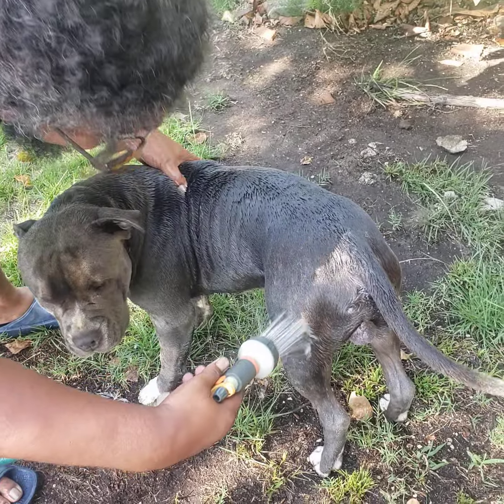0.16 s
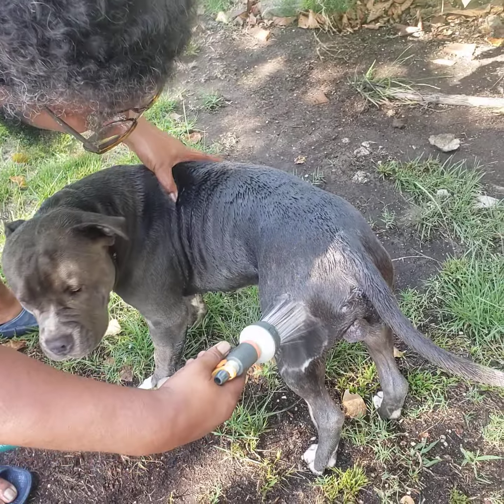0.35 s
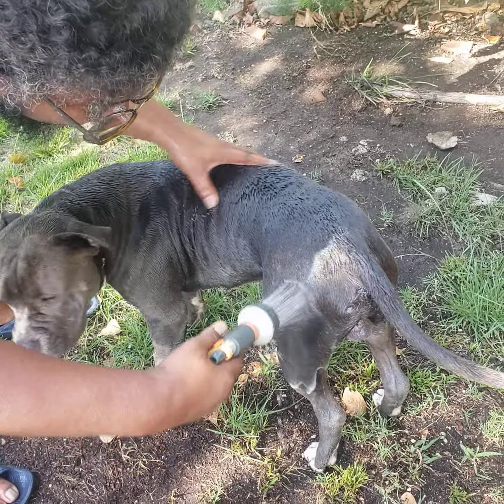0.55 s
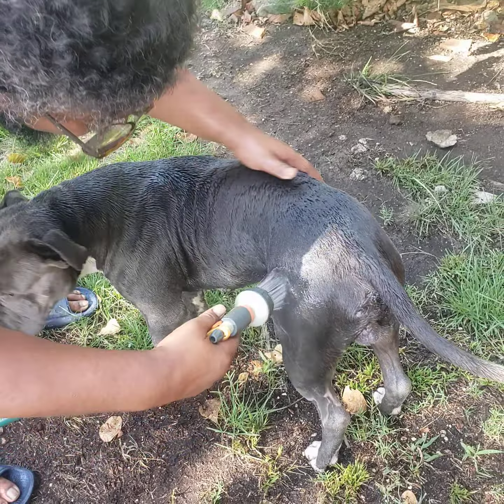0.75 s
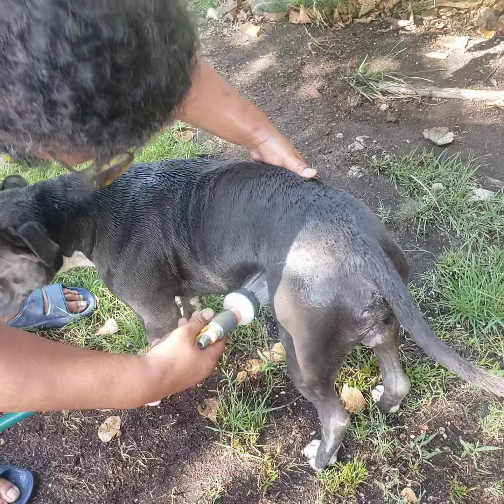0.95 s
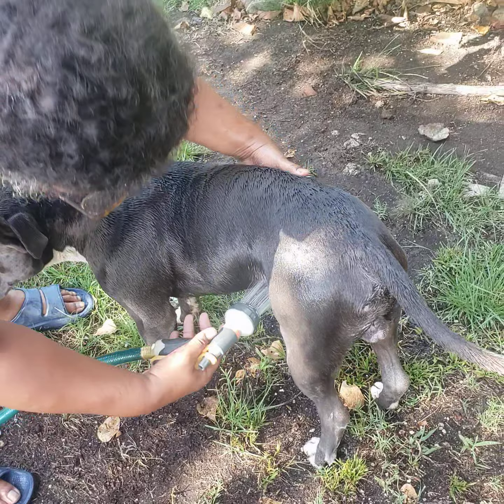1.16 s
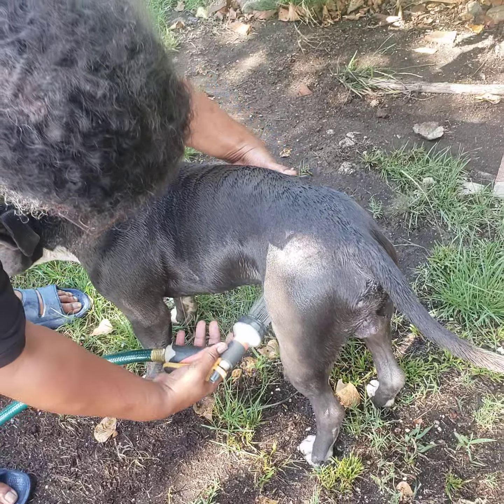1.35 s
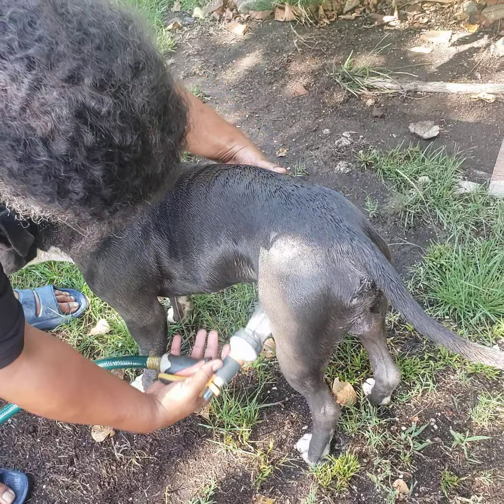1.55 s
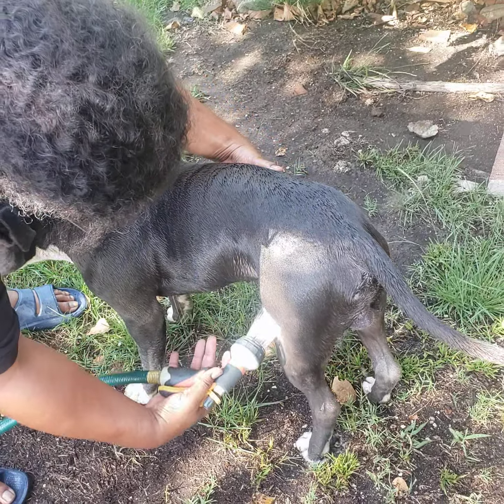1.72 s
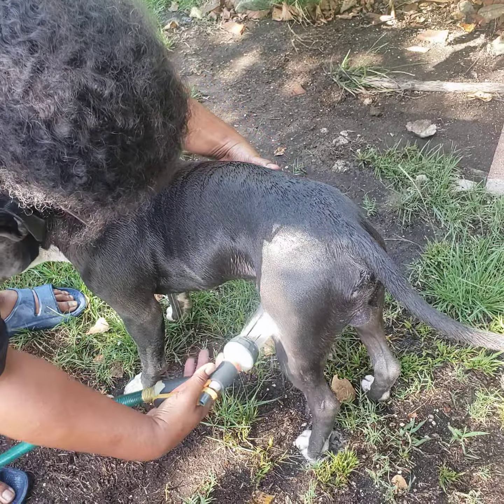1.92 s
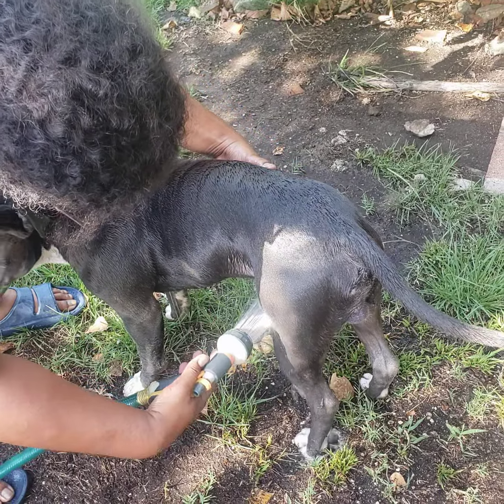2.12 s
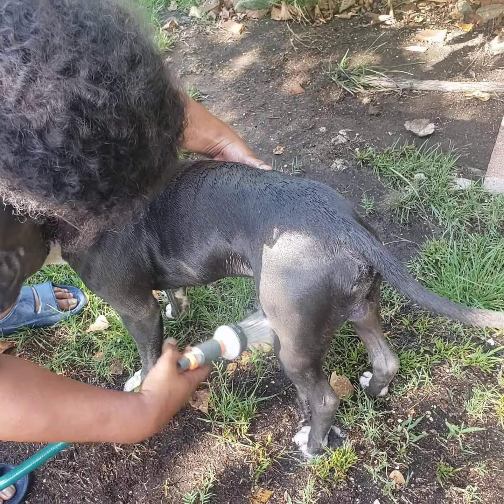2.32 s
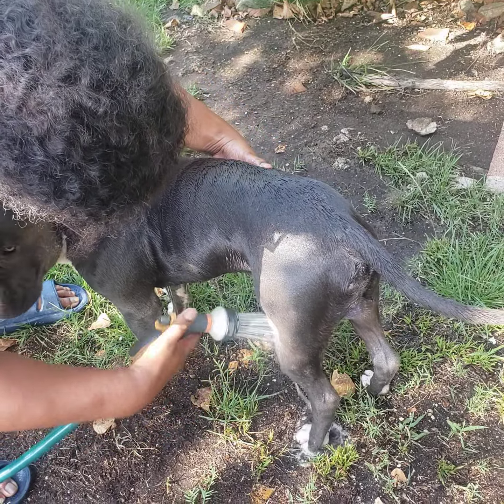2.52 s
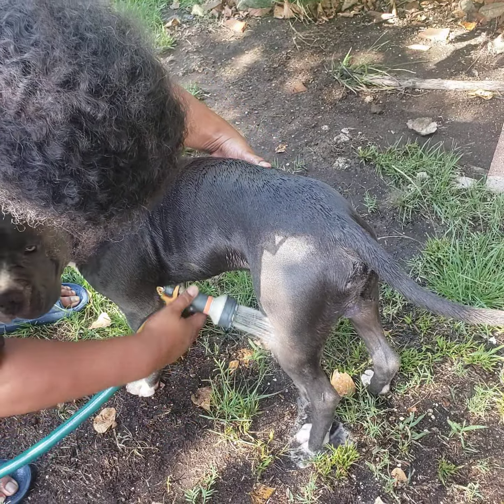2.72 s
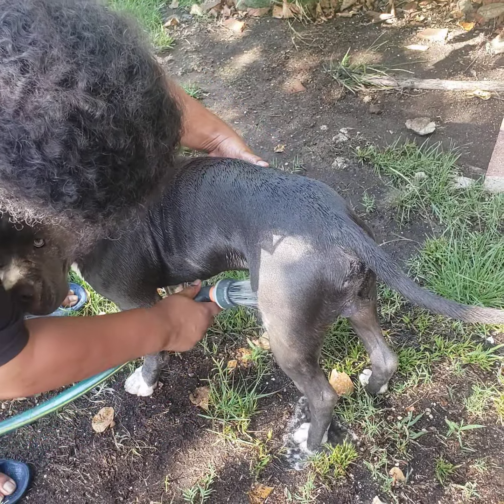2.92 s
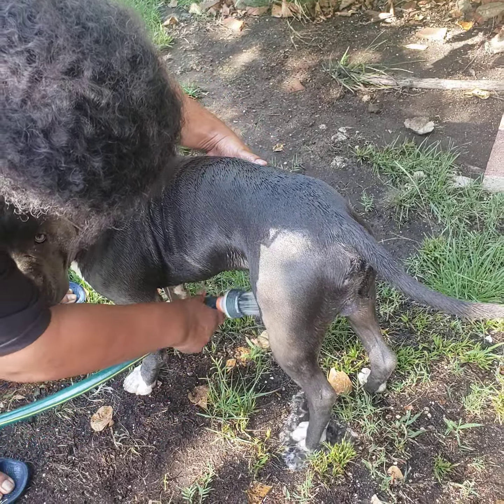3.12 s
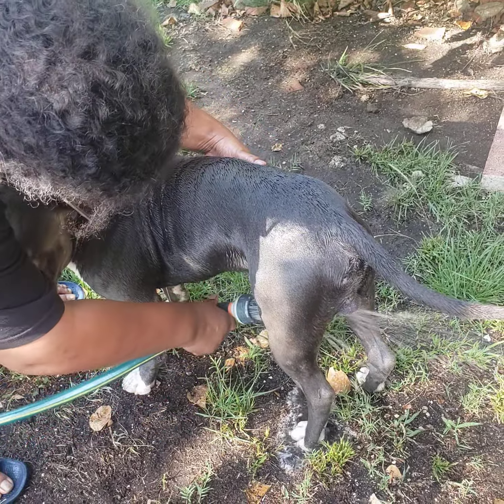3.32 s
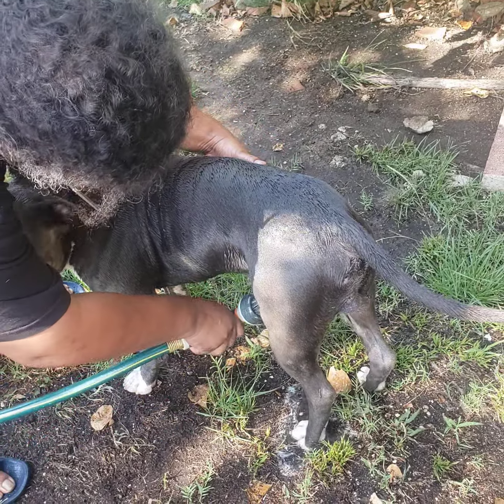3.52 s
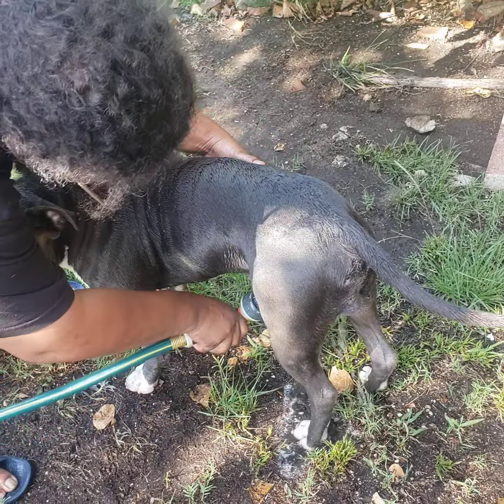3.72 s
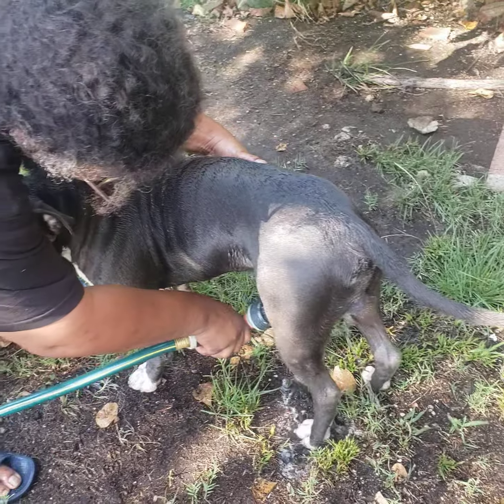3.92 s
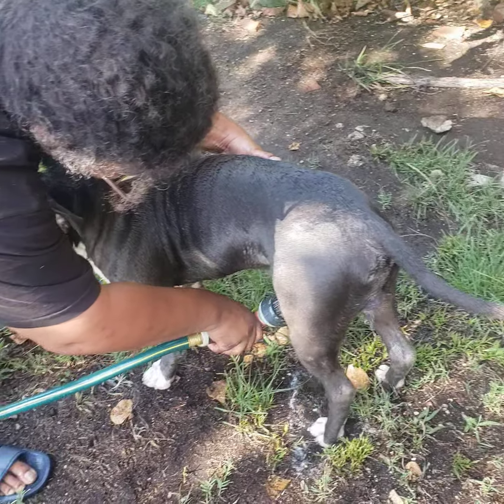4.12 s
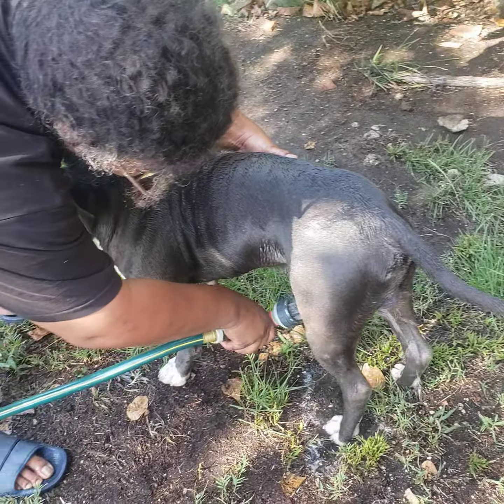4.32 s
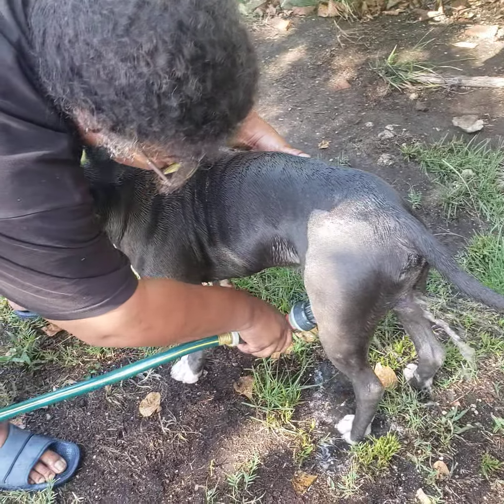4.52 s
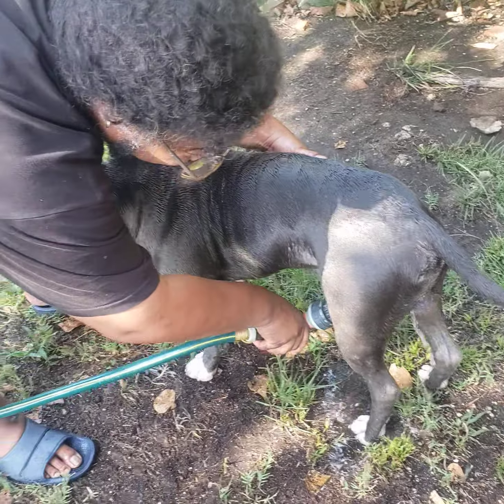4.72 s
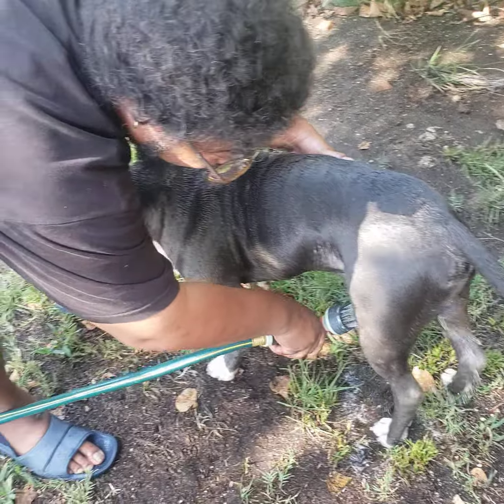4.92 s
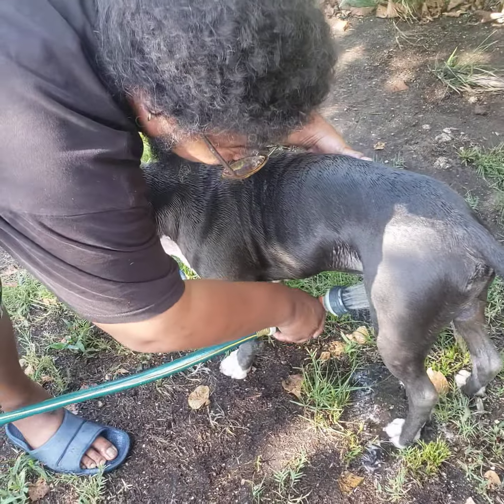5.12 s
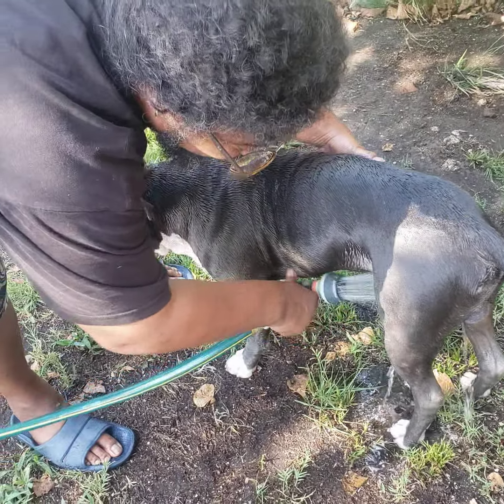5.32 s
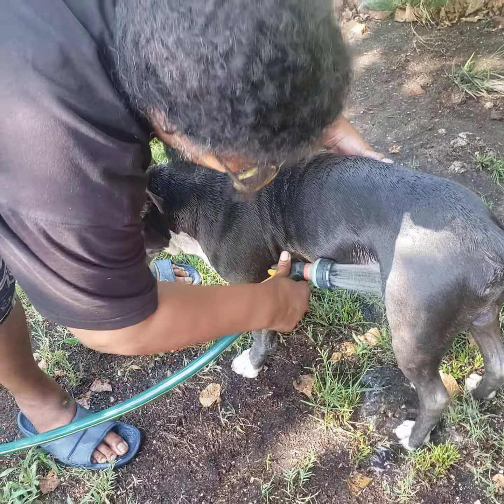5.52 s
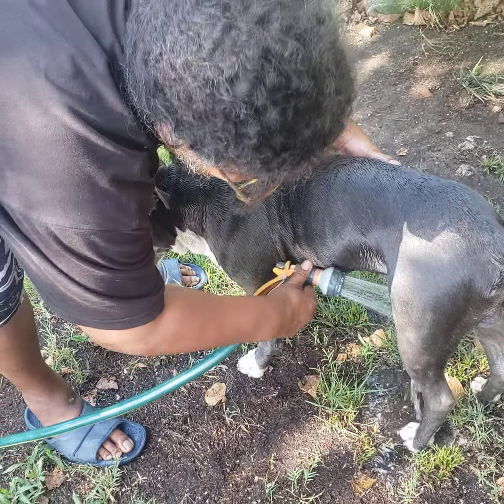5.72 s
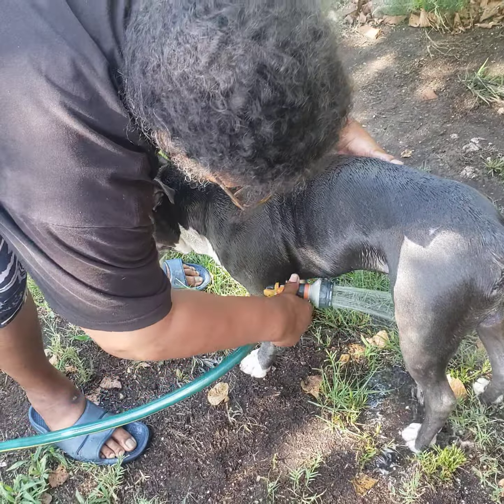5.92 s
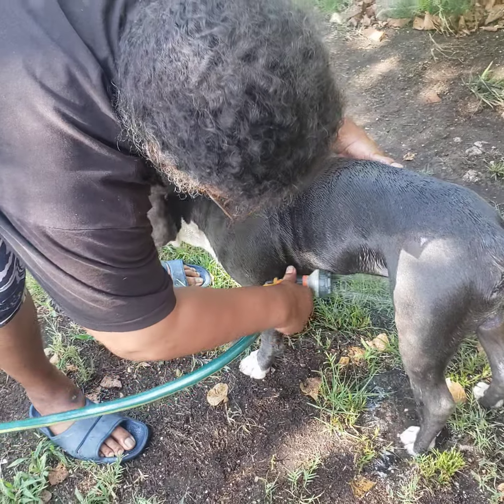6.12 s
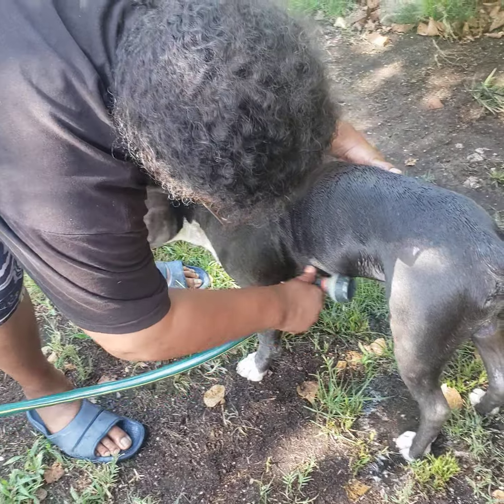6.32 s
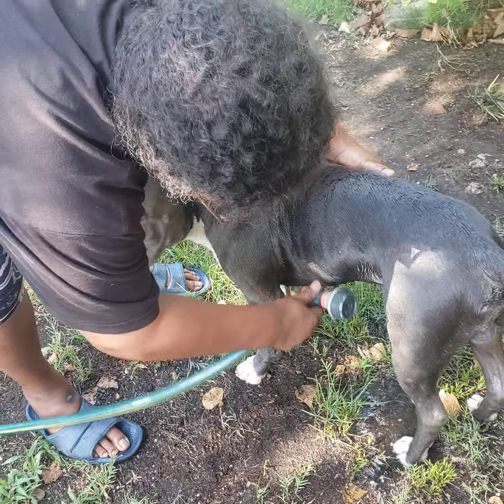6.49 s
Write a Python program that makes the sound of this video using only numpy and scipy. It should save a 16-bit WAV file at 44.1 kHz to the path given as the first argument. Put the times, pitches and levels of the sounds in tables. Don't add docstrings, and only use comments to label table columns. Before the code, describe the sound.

A fine airy water jet hisses steadily near a handheld phone in a garden by day. After a second or so it swings closer, louder and fuller, pattering on wet fur with hollow splashing. It thins out, drops plop and tick nearby, then it grows again before a short rubbery squeak ends the spray. Faint traffic and a far engine sit underneath.

```python
import sys
import numpy as np
from scipy import signal
from scipy.fft import rfft, irfft, next_fast_len
from scipy.io import wavfile

SR = 44100
rng = np.random.default_rng(int(sys.argv[2]) if len(sys.argv) > 2 else 0)


def level_to_linear(level):
    exponent = np.asarray(level, float) / 20
    return 10 ** exponent


def wav_out(sig):
    wavfile.write(sys.argv[1], SR, np.round(np.clip(np.atleast_2d(sig).T, -1, 1) * 32767).astype(np.int16))


N = 289031

# pitch_hz, density_db (per Hz)
TRAFFIC_COLOUR = [(13, -51), (22, -19), (38, -12.5), (62, -4), (75, -2), (146, -11.5), (171, -15.5),
                  (193, -18.5), (222, -15.5), (370, -28.5), (500, -33.5), (650, -42), (1100, -120)]
# time_s, level_db
TRAFFIC_LEVEL = [(0.0, -56), (0.29, -53), (0.46, -52), (0.53, -56), (1.06, -52), (1.95, -57), (2.17, -52),
                 (2.24, -55.5), (2.64, -53.5), (3.87, -55.5), (4.45, -52), (4.54, -58), (4.63, -49.5),
                 (4.78, -54), (5.02, -48.5), (5.29, -53), (5.45, -47.5), (5.58, -53.5), (5.67, -49),
                 (6.2, -50.5), (6.29, -58), (6.38, -48.5), (6.55, -56.5)]
# time_s, pitch_hz, level_db
ENGINE_PASS = [(.2, 125, -67.5), (.45, 150, -65), (.8, 155, -66), (1.1, 125, -63), (1.5, 100, -70),
               (1.9, 80, -65)]
# multiple, level_db
ENGINE_ORDERS = [(1, 3), (1.75, -6)]
# time_s, pitch_hz, level_db
LATE_MOTOR = [(5.66, 133, -75), (5.74, 133, -57.5), (5.9, 132.5, -61.5), (5.98, 131, -77)]
# multiple, level_db
LATE_MOTOR_ORDERS = [(1, 0), (5, -5.5)]
# time_s, pitch_hz, right_db, left_minus_right_db, then partials 2, 3, 5 below the first in _db
VALVE_SQUEAK = [(6.105, 885, -66, -6, -17, -40, -40), (6.126, 893, -45, -7, -20, -33, -35),
                (6.134, 885, -40, -5, -8, -35, -32), (6.143, 832, -27, -12, 0, -37, -23),
                (6.151, 812, -24.5, -4, -3, -34, -23.5), (6.159, 811, -23, -6, -3.5, -34, -25),
                (6.167, 834, -27, -8, -5, -24, -30), (6.175, 832, -27, -10, 0, -23, -29),
                (6.186, 826, -26, -8, 0, -22, -27), (6.198, 836, -26.5, -12, -3, -19, -35),
                (6.206, 850, -32, -15, 2, -29, -45), (6.222, 868, -31, -15, -3, -30, -45),
                (6.23, 875, -39, -8, -7, -30, -45), (6.246, 870, -57, -6, -14, -32, -45),
                (6.265, 856, -59, 5, -20, -35, -45)]
# start_s, peak_db, pitch_hz, left_minus_right_db
LARGE_DROPS = [
    (0.4424, -45, 1820, -0.5),
    (2.909, -43, 2080, 0.0),
    (4.135, -35.5, 3110, 1.0),
    (4.1829, -44, 3950, 1.5),
    (4.7621, -39, 2860, 6),
    (5.7693, -44, 2540, 6),
]
# start_s, peak_db, pitch_hz, left_minus_right_db
DROP_TICKS = [
    (2.7127, -30, 5980, -4.0),
    (5.295, -30, 5140, -2),
    (5.5783, -29, 5960, -3.5),
    (5.8094, -39, 4710, -4.0),
    (5.917, -37.5, 5550, -5.5),
    (6.1094, -42, 6820, -1.5),
    (6.4797, -52, 6140, -7),
    (6.5375, -65, 4790, -5.0),
]
# start_s, end_s, pitch_hz, width_hz, level_db, left_minus_right_db
AIR_POCKETS = [(1.45, 2.51, 1325, 154, -54, 0.5), (1.5, 2.44, 1790, 150, -56.5, 6),
               (.75, 1.4, 1600, 120, -77, -5), (3.5, 5.4, 850, 150, -64.5, -3),
               (4, 6.0, 1700, 180, -67, -4), (2.3, 2.8, 4210, 300, -49, -1),
               (4.5, 5.7, 6600, 280, -58.5, 12), (4.95, 5.95, 11950, 450, -39, -10.5),
               (0, 0.66, 11900, 470, -38, -5), (1.45, 2.0, 11700, 750, -35.5, -10),
               (1.35, 1.606, 5000, 500, -46, -16.5)]
# time_s, jet_db, spatter_db, slap_db, runoff_db, jet_left_minus_right_db
SPRAY_LEVELS = [(0.0, -36.5, -55, -77, -65.5, -1.5), (0.14, -35, -53.5, -74.5, -67, -2),
                (0.44, -35.5, -51, -62, -69, 2), (0.53, -33, -57, -71, -69, -1),
                (0.6, -33.5, -52, -59.5, -69, -2.5), (0.66, -38.5, -53, -71, -69.5, 0),
                (0.86, -36.5, -51.5, -66, -65, -0.5), (0.95, -37, -54, -68.5, -64, 0),
                (1.04, -38, -53.5, -86, -64, 2), (1.15, -40.5, -53, -84, -66, 2),
                (1.33, -38.5, -48.5, -85, -66, 2), (1.4, -33.5, -46.5, -66, -63.5, 1),
                (1.44, -33.5, -47, -63, -58, 2), (1.5, -30, -37.5, -53, -61, 2),
                (1.6, -24, -36, -47.5, -54, -1), (1.64, -27.5, -37.5, -49, -55.5, -1),
                (1.71, -26.5, -37, -49, -57.5, 3.5), (1.81, -26, -37.5, -46, -57, 0),
                (1.84, -25, -36.5, -45, -58, -4.0), (1.9, -27, -39, -44.5, -57.5, -1.5),
                (2.02, -30, -44, -49.5, -60, 0), (2.15, -32.5, -44, -52, -63, 1),
                (2.21, -32, -42, -51, -54.5, 1), (2.35, -30.5, -45.5, -55.5, -63, -1),
                (2.48, -34.5, -50, -57, -60, 4), (2.63, -34.5, -47.5, -64, -66, -4.5),
                (2.68, -38, -43, -59, -60, -1), (2.75, -35.5, -50, -61, -66, -2.0),
                (2.88, -36, -48, -61, -63, 2), (2.92, -37.5, -53, -62, -65, 0),
                (2.96, -39, -53, -65, -66, 2), (3.23, -40.5, -55.5, -73, -65.5, 1.5),
                (3.32, -40.5, -55.5, -78, -65, 1.5), (3.54, -42.5, -58, -77, -64.5, 6),
                (3.59, -39, -59.5, -66, -64.5, 2), (3.67, -40, -56.5, -70.5, -63, 3),
                (3.9, -40.5, -54.5, -64.5, -66, 2), (3.96, -39.5, -56.5, -72, -67, 1),
                (4.12, -43, -56, -64, -66.5, 1), (4.14, -39, -52, -59, -68, -1.0),
                (4.16, -41.5, -52.5, -64.5, -70, 1), (4.34, -40.5, -52, -71, -66, 4),
                (4.72, -39.5, -51.5, -67, -63.5, 2), (4.76, -38.5, -48.5, -59, -67, 0.0),
                (4.8, -39, -49.5, -62.5, -65.5, 2), (4.94, -40, -48, -70, -55, 3),
                (5.09, -36.5, -48, -77, -60, -1), (5.2, -38, -46, -70, -59, 3),
                (5.34, -36, -45.5, -56.5, -57, 3), (5.4, -36, -45.5, -62, -56.5, 0),
                (5.51, -29, -48, -62, -55, -1), (5.58, -32, -46, -61.5, -59.5, -2),
                (5.62, -33, -47, -70, -55, -2), (5.71, -32.5, -48.5, -59, -60.5, -6.5),
                (5.76, -34, -47, -63, -57.5, -2.5), (5.95, -36.5, -55, -83, -60.5, -3.5),
                (6.0, -36.5, -52, -66, -63.5, -1), (6.11, -38, -54, -81, -60.5, -3.0),
                (6.18, -41.5, -57, -66, -61, 2), (6.26, -53, -70, -84, -61.5, 0),
                (6.33, -61, -82, -82, -65, -1), (6.55, -62, -79, -88, -65.5, 1.5)]
# pitch_hz, left_db, right_db
JET_COLOUR = [(6010, -18, -18), (8000, -27.5, -32), (10000, -18.5, -21), (10980, -20.5, -10.5),
              (11900, -8.5, 0), (12840, -13.5, -7), (14030, -6.5, -11), (15550, 4, -11)]
SPATTER_COLOUR = [(2490, -32.5, -27.5), (3470, -21, -22.5), (3990, -7, -1.5), (4450, -2.5, 1.5),
                  (5250, -8, 3), (5970, -19, -1), (6670, -1.5, -3), (7520, -7, -8), (8800, -10.5, -7),
                  (11000, 0, -1)]
SLAP_COLOUR = [(710, -26, -30), (1120, -5, -9), (1380, -10, -2.5), (1780, 0.5, 1), (2300, -4.5, -3.5),
               (2780, -1.5, -7), (3390, -5.5, -9), (4220, 2, -7)]
RUNOFF_COLOUR = [(250, -8, -15), (450, -7.5, -4.5), (850, 0.5, -1.5), (1280, -4.5, -7.5), (1700, -1.5, -4),
                 (2200, -19, -26), (3000, -32, -42)]
# pitch_hz, likeness_0_to_1
PORT_LIKENESS = [(60, 0.95), (300, .9), (700, .72), (1400, 0.42), (3000, 0.37), (5000, 0.42), (15000, 0.22)]


def rms_one(x):
    return x / np.sqrt(np.mean(x ** 2) + 1e-20)


def in_time(rows):
    s, *columns = np.transpose(rows)
    return [np.interp(np.arange(N) / SR, s, column) for column in columns]


def at_hz(points, hz):
    f, *columns = np.transpose(points)
    return np.array([np.interp(np.log(hz + 1), np.log(f), column) for column in columns])


def sides(pan_db):
    return level_to_linear(np.array([pan_db / 2, -pan_db / 2]))


def drift(rate_hz):
    r = np.exp(-2 * np.pi * rate_hz * 40 / SR)
    noise = rng.standard_normal(N // 40 + 4002)
    slow = signal.lfilter([1], [1, -2 * r, r * r], noise)[4000:]
    return np.interp(np.arange(N) / 40, np.arange(len(slow)), rms_one(slow))


def resonate(x, hz, width_hz):
    r = np.exp(-np.pi * width_hz / SR)
    peak = (1 - r * r) / 2
    return signal.lfilter([peak, 0, -peak], [1, -2 * r * np.cos(2 * np.pi * hz / SR), r * r], x)


def patter(per_s, spread_db, share):
    sizes = level_to_linear(spread_db * np.minimum(rng.exponential(1, (2, N)), 5))
    signs = rng.choice([-1, 1], (2, N))
    hits = rng.random((2, N)) < per_s / SR
    drops = rms_one(sizes * signs * hits)
    return np.sqrt(share) * drops + np.sqrt(1 - share) * rng.standard_normal((2, N))


def at_ports(streams, colour, patchy_db, flutter_db, count):
    left_lag_s = .0001
    size = next_fast_len(N)
    hz = np.arange(size // 2 + 1) * SR / size
    one, other = rfft(streams, size)
    alike = np.clip(at_hz(PORT_LIKENESS, hz)[0], 0, 1)
    pair = np.sqrt(1 + alike) * one + np.sqrt(1 - alike) * other * [[1], [-1]]
    pair[0] *= np.exp(-2j * np.pi * hz * left_lag_s)
    low_hz, high_hz = colour[0][0], min(colour[-1][0], 16000)
    pair *= level_to_linear(at_hz(colour, hz)) * (hz > low_hz)
    place = count * np.log(hz / low_hz + 1e-9) / np.log(high_hz / low_hz)
    together = drift(29)
    out = 0
    for k in range(count + 1):
        band = np.cos(np.pi / 2 * np.clip(place - k, -1, 1)) ** 2
        gain = level_to_linear(patchy_db * drift(2.42) + flutter_db * (together + 0.64 * drift(25)))
        out = out + gain * irfft(pair * band, size)[:, :N]
    return out / np.sqrt(np.mean(out.mean(0) ** 2))


def port_floor():
    return level_to_linear(-83) * signal.lfilter([1, -.7], [1], rng.standard_normal((2, N)))


def far_traffic():
    both = [(hz, db - .6, db + .6) for hz, db in TRAFFIC_COLOUR]
    rumble = at_ports(rng.standard_normal((2, N)), both, patchy_db=2.0, flutter_db=0.33, count=5)
    return level_to_linear(in_time(TRAFFIC_LEVEL)[0]) * rumble


def far_engine(curve, orders):
    hz, db = in_time(curve)
    t = np.arange(N) / SR
    phase = 2 * np.pi * np.cumsum(hz * (1 + .012 * drift(8))) / SR
    tone = sum(level_to_linear(level_db + 1.7 * drift(6)) * np.sin(k * phase) for k, level_db in orders)
    running = (t > curve[0][0]) * (t < curve[-1][0])
    return np.sqrt(2) * level_to_linear(db) * tone * running


def valve_squeak():
    hz, right_db, pan_db, second_db, third_db, fifth_db = in_time(VALVE_SQUEAK)
    sounding = (right_db > VALVE_SQUEAK[0][2]) * (np.arange(N) < VALVE_SQUEAK[-1][0] * SR)
    on = np.sqrt(2) * level_to_linear(right_db) * sounding
    phase = 2 * np.pi * np.cumsum(hz) / SR
    partials_db = (0, second_db, third_db, third_db - 18, fifth_db)
    left_lifts_db = (0, -0.5, 8.5, 5, 2)
    right, left = 0, 0
    for k, db, lift_db in zip((1, 2, 3, 4, 5), partials_db, left_lifts_db):
        angle = k * phase + .6 * (k - 1)
        right = right + level_to_linear(db) * np.cos(angle)
        left = left + level_to_linear(db + lift_db) * np.cos(angle - .9)
    return on * np.array([level_to_linear(pan_db) * left, right])


def single_drops(table, decay_s, broad):
    length = 800
    out, t = np.zeros((2, N + 900)), np.arange(length) / SR
    for s, db, hz, pan_db in table:
        noise = rng.standard_normal(length)
        burst = resonate(noise * np.exp(-t / decay_s), hz, broad * hz)
        first = int(s * SR)
        out[:, first:first + length] += level_to_linear(db) * sides(pan_db)[:, None] * burst / abs(burst).max()
    return out[:, :N]


def air_pockets():
    out = np.zeros((2, N))
    for start, end, hz, width_hz, db, pan_db in AIR_POCKETS:
        span = slice(int(max(start, 0) * SR), int(end * SR))
        noise = rng.standard_normal((3, span.stop - span.start))
        shared = 0.67 * noise[0] + noise[1:]
        tone = rms_one(resonate(resonate(shared, hz, width_hz), hz, width_hz * 2))
        swell = signal.windows.tukey(tone.shape[1], .6)
        out[:, span] += level_to_linear(db) * sides(pan_db)[:, None] * tone * swell
    return out


def spray():
    jet_db, spatter_db, slap_db, runoff_db, pan_db = in_time(SPRAY_LEVELS)
    jet = at_ports(patter(9000, 2.9, .3), JET_COLOUR, patchy_db=0.5, flutter_db=0.88, count=6)
    spatter = at_ports(patter(4000, 3.5, .4), SPATTER_COLOUR, patchy_db=2.5, flutter_db=1.17, count=8)
    slap = at_ports(patter(900, 3.8, 0.37), SLAP_COLOUR, patchy_db=2.6, flutter_db=1.2, count=6)
    runoff = at_ports(patter(500, 2.9, 0.19), RUNOFF_COLOUR, patchy_db=0.04, flutter_db=1.4, count=5)
    out = level_to_linear(jet_db + 1.7) * sides(pan_db) * jet
    out = out + level_to_linear(spatter_db + 1.87) * spatter
    out = out + level_to_linear(slap_db + 1.5) * slap
    return out + level_to_linear(runoff_db - 0.05) * runoff


def scene():
    engines = far_engine(ENGINE_PASS, ENGINE_ORDERS) + far_engine(LATE_MOTOR, LATE_MOTOR_ORDERS)
    background = port_floor() + far_traffic() + engines
    drops = single_drops(LARGE_DROPS, decay_s=0.0031, broad=0.7)
    ticks = single_drops(DROP_TICKS, decay_s=.0012, broad=0.51)
    return background + valve_squeak() + drops + ticks + air_pockets() + spray()


def band_limit(x):
    return signal.sosfilt(signal.butter(12, 17050, fs=SR, output="sos"), x)


def record(dry):
    low_pass = signal.cheby2(14, 70, 16050, fs=SR, output="sos")
    finished = signal.sosfilt(low_pass, dry)
    return band_limit(finished)


dry = scene()
out = record(dry)
wav_out(out)
```